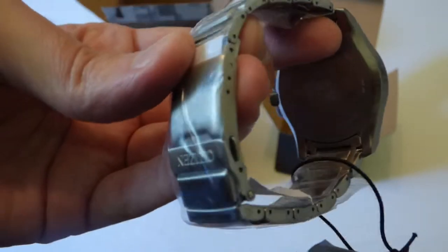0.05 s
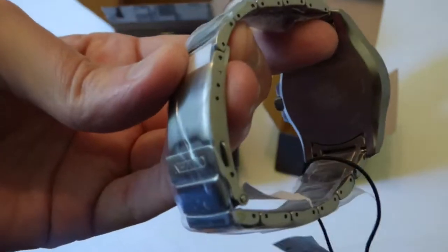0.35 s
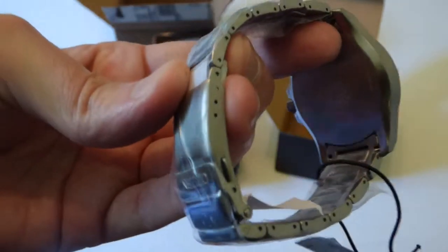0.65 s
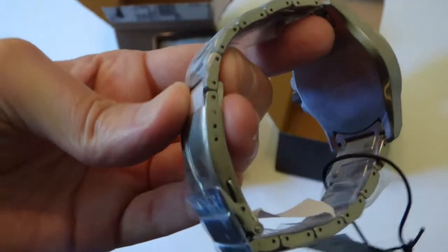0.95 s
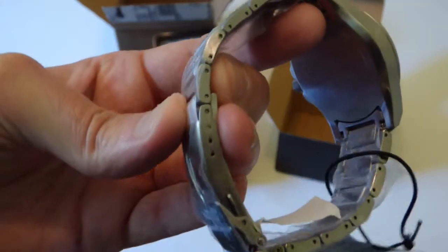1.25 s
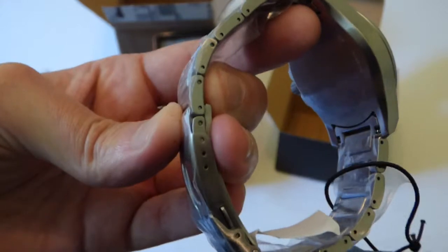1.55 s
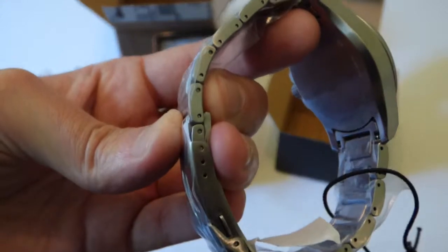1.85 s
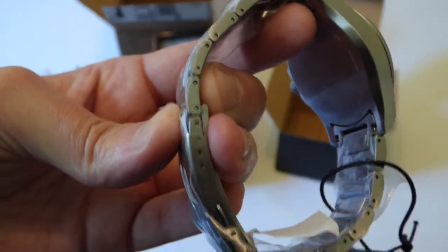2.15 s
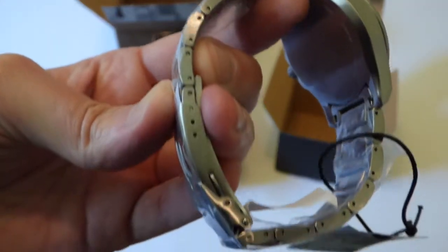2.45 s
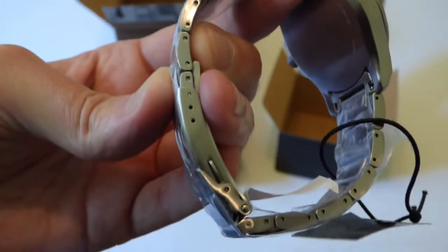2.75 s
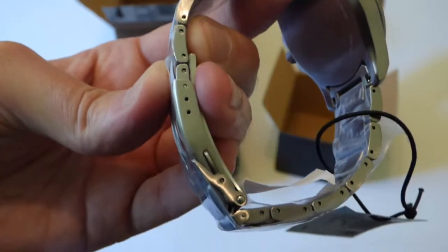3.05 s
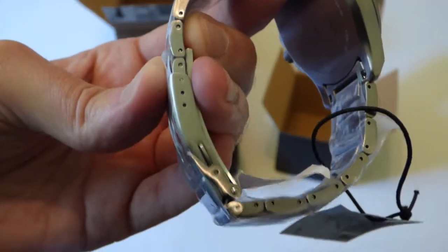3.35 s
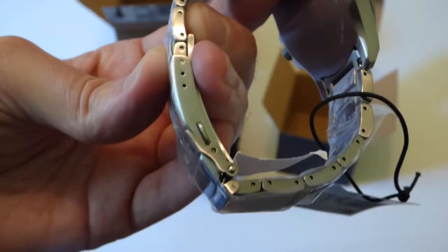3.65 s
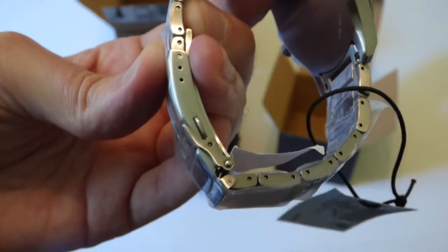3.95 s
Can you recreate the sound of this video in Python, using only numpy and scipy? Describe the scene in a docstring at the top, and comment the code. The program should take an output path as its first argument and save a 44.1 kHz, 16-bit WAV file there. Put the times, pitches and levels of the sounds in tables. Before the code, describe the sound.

A metal watch bracelet clicks sharply as it is handled, with faint plastic crinkling.

```python
"""Steel watch bracelet in plastic wrap

The bracelet is turned in the hand, close by in a quiet room. Its links snap against each other,
the wrap and tag tick faintly, and a few soft knocks ring a hollow body, some with a short scrape.
The desk and walls return each click over a steady hiss."""
import sys
import numpy as np
from scipy import signal
from scipy.fft import rfft, irfft
from scipy.io import wavfile

SR = 44100
rng = np.random.default_rng(int(sys.argv[2]) if len(sys.argv) > 2 else 0)


def bounce(signal):
    """Save signal as a 16-bit WAV file at the path given by the first command-line argument."""
    frames = np.transpose(np.atleast_2d(signal))
    limited = np.clip(frames, -1, 1)
    pcm = np.round(limited * 32767).astype(np.int16)
    wavfile.write(sys.argv[1], SR, pcm)


N = 4 * SR
BAND_LIMIT_HZ = 16400


def amp(db):
    """Decibels to gain."""
    return 10 ** (np.asarray(db) / 20)


def curve_at(points, hz):
    """Interpolate (Hz, value) points on a log-frequency axis."""
    f, value = np.transpose(points)
    return np.interp(np.log(hz + 1), np.log(f + 1), value)


def add(mix, start_s, sound):
    """Mix a sound in at start_s."""
    part = mix[..., max(round(start_s * SR), 0):][..., :sound.shape[-1]]
    part += sound[..., :part.shape[-1]]


def resonance(f, hz, q):
    """Complex response of one resonance."""
    return 1 / (1 + 1j * q * (f / hz - hz / (f + 1)))


# Each row: frequency in Hz, relative spectral density in dB.
HISS_SPECTRUM = [(20, -22.5), (50, -25.5), (110, -22.5), (170, -24.5), (260, -23.5), (500, -27.5),
                 (900, -28), (1700, -33), (3300, -39.5), (4100, -34.5), (5200, -39.5), (9000, -39.5),
                 (14500, -41), (16000, -48)]
# Each row: frequency in Hz, side minus mid in dB.
HISS_WIDTH = [(50, -33), (220, -5), (700, 4.5), (2400, 0), (15000, -3.5)]
# Each row: time in seconds, gain in dB.
HISS_DRIFT = [(0, 1), (1.4, 2.5), (2, 0), (4, 1)]


def hiss(mid_db=-70):
    """Room tone and microphone hiss, drifting slightly in level."""
    t, f = np.arange(N) / SR, np.fft.rfftfreq(N, 1 / SR)
    spectra = rfft(rng.standard_normal((2, N))) * amp(curve_at(HISS_SPECTRUM, f)) * (f < BAND_LIMIT_HZ)
    mid = irfft(spectra[0], N)
    side = irfft(spectra[1] * amp(curve_at(HISS_WIDTH, f)), N)
    level = amp(mid_db + np.interp(t, *np.transpose(HISS_DRIFT)))
    return level * np.array([mid + side, mid - side]) / mid.std()


# Each row: delay in seconds, energy in dB relative to the whole tail.
REFLECTIONS = [(.0060, -8), (0.0105, -4.5)]
# Each row: frequency in Hz, T60 in seconds.
ROOM_DECAY = [(300, 0.073), (2000, 0.24), (5300, 0.36), (10000, 0.24), (14000, 0.17)]


def room(send, rise_s=0.00028):
    """Desk and walls return two near reflections and a short diffuse tail."""
    hz, t, noise = signal.stft(rng.standard_normal((2, SR // 2)), SR, nperseg=256)
    decay = np.exp(-np.log(1000) * t / curve_at(ROOM_DECAY, hz)[:, None])
    response = signal.istft(noise * decay, SR)[1]
    response *= 1 - np.exp(-np.arange(response.shape[1]) / SR / rise_s)
    response /= np.linalg.norm(response[0])
    for delay_s, db in REFLECTIONS:
        for channel in response:
            add(channel, delay_s + rng.uniform(0, 0.00003), amp([db]))
    return signal.fftconvolve(send, response, axes=1)[:, :N]


# Each row: peak time in seconds, peak level in dB, centre in Hz.
SCRAPES = [(1.327, -64.5, 1100), (1.926, -63.5, 2400), (3.644, -55.5, 2280)]


def scrapes(rise_s=0.0053, fall_s=0.0037):
    """Friction noise swells for a few milliseconds and stops against a knock."""
    t, f = np.arange(N) / SR, np.fft.rfftfreq(N, 1 / SR)
    out = np.zeros((2, N))
    for peak_s, db, hz in SCRAPES:
        noise = rng.standard_normal(N) + 0.5 * rng.standard_normal((2, N))
        rub = irfft(rfft(noise) * resonance(f, hz, q=0.51) ** 2, N)
        envelope = np.exp(np.minimum((t - peak_s) / rise_s, (peak_s - t) / fall_s))
        out += amp(db) * envelope * rub / rub.std()
    return out


# Each row: start in seconds, mid gain in dB, side gain in dB, centre of the push in Hz.
KNOCKS = [(.621, -46.5, -47, 338), (1.03, -56.5, -65, 335), (1.066, -66, -66, 447),
          (1.291, -58.5, -55, 950), (1.3244, -61.5, -50.5, 1080), (1.8898, -51, -46, 795),
          (1.925, -47.5, -45, 1050), (3.646, -56.5, -55, 533)]
# Each row: frequency in Hz, mid gain in dB, side gain in dB, T60 in seconds.
HOLLOW_MODES = [(238.5, 6, -28, 0.19), (437, -0.5, -26, 0.077), (531, 0.5, -12, 0.055), (686, -4, 2, 0.061),
                (738, 4, 1, 0.036), (810, -38, -7, 0.045), (884, 0.5, -2, 0.085), (975, -7, -28, 0.058),
                (1247, -5, -10, 0.054), (1574, -6, -15, 0.1), (1660, 0.5, -17, 0.068)]


def knocks(relative_linewidth=0.012, rise_cycles=0.88):
    """Soft pushes ring a hollow body; the loose, rough contact blurs each mode's pitch."""
    out, t = np.zeros((2, N)), np.arange(SR // 4) / SR
    for start_s, mid_db, side_db, push_hz in KNOCKS:
        for hz, mode_mid_db, mode_side_db, t60_s in HOLLOW_MODES:
            step_rad = np.sqrt(2 * np.pi * relative_linewidth * hz / SR)
            wander = step_rad * np.cumsum(rng.standard_normal(len(t)))
            phase = 2 * np.pi * (hz * t + rng.random()) + wander
            rise = 1 - np.exp(-(t * hz / rise_cycles) ** 2)
            decay = np.exp(-np.log(1000) * t / t60_s)
            push = 0.16 + abs(resonance(hz, push_hz, q=2.2)) ** 2
            mid = amp(mid_db + mode_mid_db) * push * np.sin(phase)
            side = amp(side_db + mode_side_db) * np.cos(phase)
            add(out, start_s, rise * decay * np.array([mid - side, mid + side]))
    return out


SMALL_CLICK_Q, SMALL_GAP_S = 2.04, (0.00009, 0.00015)
# Each row: frequency in Hz, gain in dB.
CLICK_EQ = [(2500, 2.5), (3300, -3), (4200, 1), (5300, 2.5), (7000, 1.5), (12500, -1.5), (14500, -7),
            (16000, -11), (17000, -25)]


def click(ring_db, ring_hz, ring_q, body_db, body_hz, body_q, gap_s, modes=(), modes_db=0):
    """A contact lands twice with brief chatter, exciting a bright ring, a duller body and any modes."""
    t, f = np.arange(1024) / SR, np.fft.rfftfreq(1024, 1 / SR)
    grit = rng.standard_normal(len(t)) + 0.22 * rng.standard_normal((2, len(t)))
    chatter = 0.33 * grit * np.exp(-t / 0.00048)
    second_landing = np.exp(-2j * np.pi * f * gap_s)
    force = rfft((t == 0) + chatter) + second_landing
    force /= np.sqrt(abs(force))  # halves the ripple in dB
    body = amp(body_db) * resonance(f, body_hz, body_q) ** 2
    body += sum(amp(modes_db + db) * resonance(f, hz, q) for hz, q, db in modes)
    response = amp(ring_db) * resonance(f, ring_hz, ring_q) ** 2 + 1j * body
    spectrum = force * response
    spectrum *= np.linalg.norm(response) / np.linalg.norm(spectrum, axis=1, keepdims=True)
    onset_delay = np.exp(-2j * np.pi * f * 8 / SR)
    fade = np.minimum(1, 2 - 2 * t / t[-1])
    return irfft(spectrum * onset_delay * amp(curve_at(CLICK_EQ, f))) * fade


# Each row: start in seconds, ring gain in dB, ring in Hz, body gain in dB, body in Hz. # The row at 1.453 s is
# a small link snap, played the same way as the ticks.
WRAP_TICKS = [(0.063, -32.5, 9100, -29, 1700), (0.1877, -18.5, 8200, -19, 1660),
              (0.2756, -32, 8800, -23, 1350), (0.305, -41, 7860, -29.5, 1420),
              (0.3185, -27.5, 10900, -32, 3040), (0.3917, -37, 7100, -34.5, 3870),
              (.4731, -38, 10900, -31.5, 4870), (0.5038, -15, 10600, -29.5, 2670),
              (0.7932, -38, 8140, -34.5, 4450), (0.8364, -29, 10500, -46, 5030),
              (0.9412, -22.5, 11100, -37, 6030), (0.9806, -20.5, 10000, -23, 2380),
              (1.211, -31.5, 7700, -27.5, 3600), (1.4191, -24, 11000, -33, 4000),
              (1.453, -23, 12000, -30, 4760), (1.6916, -24, 10500, -43, 6000),
              (1.7904, -18.5, 12400, -50, 4960), (1.799, -57, 8000, -32.5, 3080),
              (1.8969, -25, 11700, -43, 5930), (2.0198, -36, 10000, -33, 6300),
              (2.191, -43, 7240, -34, 2800), (3.8627, -38, 10600, -39.5, 5500),
              (3.9098, -36, 12000, -39, 6000)]
# Dull push under each tick. Each row: frequency in Hz, Q, gain in dB relative to the body.
TICK_THUD = [(584, 1.5, -3)]
# Each row: time in seconds, grains per second.
CRINKLE_RATE = [(0, 110), (1.3, 45), (2.1, 2), (3.7, 1), (4, 30)]


def wrap(body_q=0.82):
    """Plastic wrap and tag tick over a sparse random crinkle, with one small link snap among the ticks."""
    out, t = np.zeros((2, N)), np.arange(N) / SR
    for start_s, ring_db, ring_hz, body_db, body_hz in WRAP_TICKS:
        gap_s = rng.uniform(*SMALL_GAP_S)
        tick = click(ring_db, ring_hz, SMALL_CLICK_Q, body_db, body_hz, body_q, gap_s, TICK_THUD, body_db)
        add(out, start_s, tick)
    grains_per_s = np.interp(t, *np.transpose(CRINKLE_RATE))
    for start_s in t[rng.random(N) < grains_per_s / SR]:
        db = -46.5 + 3 * min(rng.exponential(), 2)
        ring_hz, body_hz = rng.uniform(5000, 13100), rng.uniform(1040, 7100)
        grain = click(db, ring_hz, SMALL_CLICK_Q, db - 5, body_hz, body_q, rng.uniform(*SMALL_GAP_S))
        add(out, start_s, grain)
    return out


def link_rattle(span_s=(1.032, 1.056), step_s=0.0028):
    """Links grate over each other in quick small slips between the two loudest snaps."""
    out = np.zeros((2, N))
    for start_s in np.arange(*span_s, step_s):
        slip = click(ring_db=-25, ring_hz=10900, ring_q=SMALL_CLICK_Q,
                     body_db=-35, body_hz=4900, body_q=SMALL_CLICK_Q, gap_s=rng.uniform(*SMALL_GAP_S))
        add(out, start_s + step_s * rng.random(), rng.uniform(0.42, 1) * slip)
    return out


# Each row: start in seconds, ring gain in dB, ring in Hz, ring Q, body gain in dB, body in Hz,
# steel mode gain in dB, gap between landings in seconds, room send in dB.
LINK_SNAPS = [(0.0941, -1.5, 11500, 2.16, -7.5, 5960, -11, 0.00045, -14.5),
              (0.598, -2.5, 11000, 2.8, -27, 6760, -42, 0.00046, -11),
              (0.8832, -5, 12040, 3.4, -18.5, 7400, -22, 0.00035, -11),
              (1.0113, -13.5, 11700, 1.8, -41, 5530, -42, 0.00031, -8),
              (1.0286, 1.5, 10800, 2.13, -21.5, 5540, -32, 0.0003, -10),
              (1.0646, 1.5, 9800, 3.06, -18, 7360, -29, .00051, -13),
              (1.0757, -6, 12200, 1.9, -22, 6400, -30, 0.00036, -12.5),
              (1.2499, -15, 9200, 2.95, -33.5, 3850, -39, 0.000374, -10.5),
              (1.4265, -13.5, 9900, 1.4, -19, 3800, -33, 0.000422, -4),
              (1.43, -16.5, 10800, 3.7, -26.5, 2670, -24, 0.00034, -2.5),
              (1.448, -32, 11100, 2.6, -16.5, 5300, -21, 0.00043, -11),
              (2.7882, -25, 10100, 4.7, -39, 7000, -27.5, 0.00052, -8)]
# Each row: frequency in Hz, Q, relative gain in dB.
STEEL_MODES = [(2600, 7.7, -9), (4190, 23, 3)]


def link_snaps(body_q=1.08, room_q_ratio=0.88):
    """Steel links strike and ring briefly; the room gathers a broader ring from all directions."""
    direct, send = np.zeros((2, 2, N))
    for start_s, ring_db, ring_hz, ring_q, body_db, body_hz, steel_db, gap_s, send_db in LINK_SNAPS:
        shared = body_db, body_hz, body_q, gap_s, STEEL_MODES, steel_db
        add(direct, start_s, click(ring_db, ring_hz, ring_q, *shared))
        add(send, start_s, amp(send_db) * click(ring_db, ring_hz, ring_q * room_q_ratio, *shared))
    return direct, send


def scene(wrap_send_db=-11.5, bump_send_db=-10.5):
    """Bracelet, wrap, knocks and scrapes in the room, over the hiss."""
    snaps, snap_send = link_snaps()
    links = snaps + link_rattle()
    plastic = wrap()
    bumps = knocks() + scrapes()
    send = snap_send + amp(wrap_send_db) * plastic + amp(bump_send_db) * bumps
    return links + plastic + bumps + room(send) + hiss()


def record(dry, dc_offset=-0.0025):
    """Band limit and a small constant offset."""
    lowpass = signal.firwin(255, BAND_LIMIT_HZ, window=("kaiser", 8), fs=SR)
    return signal.oaconvolve(dry, lowpass[None], "same") + dc_offset


dry = scene()
out = record(dry)
bounce(out)
```